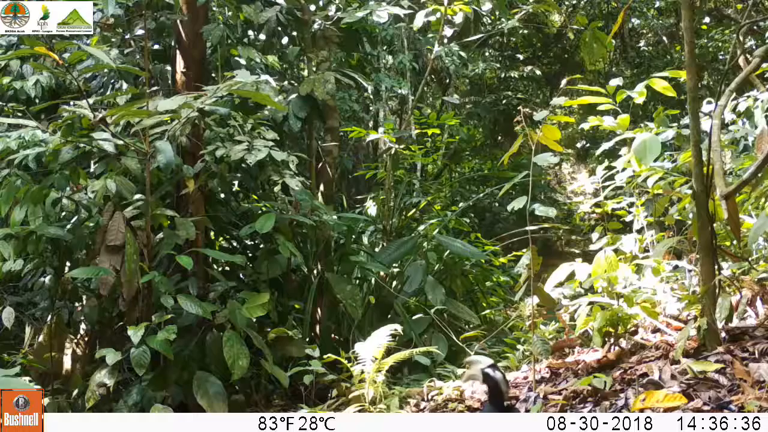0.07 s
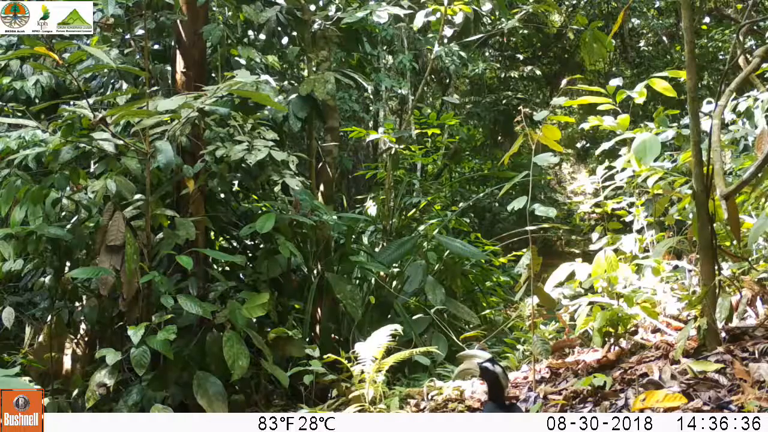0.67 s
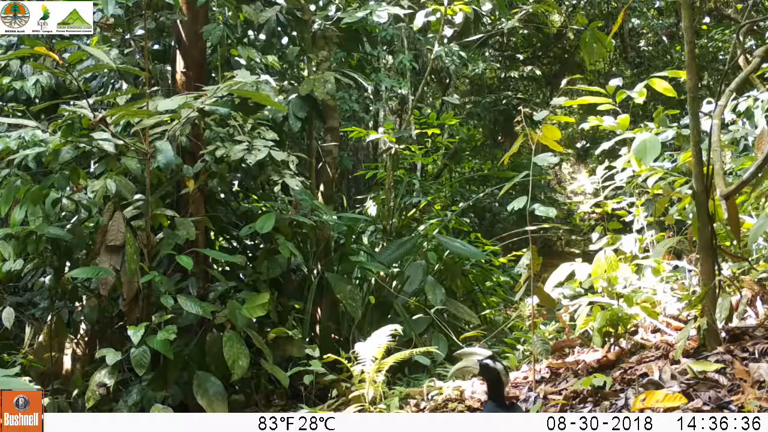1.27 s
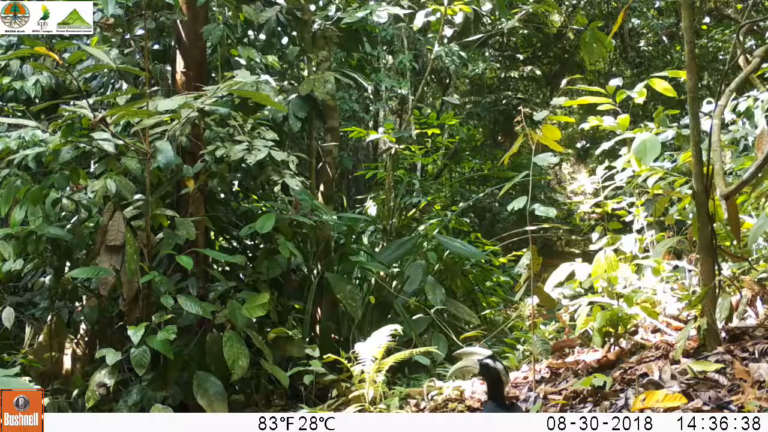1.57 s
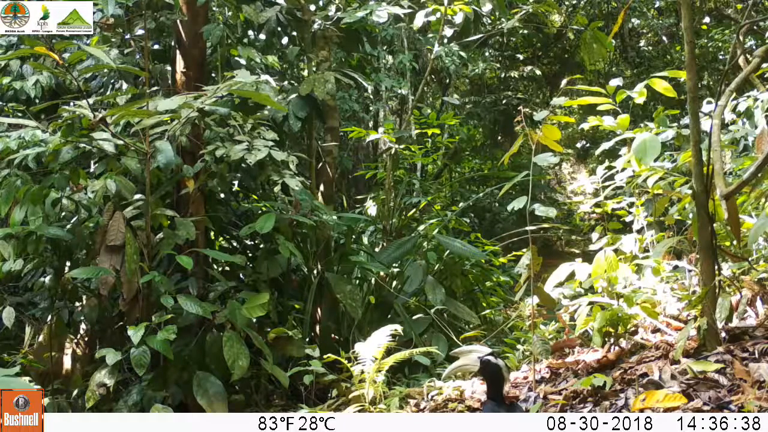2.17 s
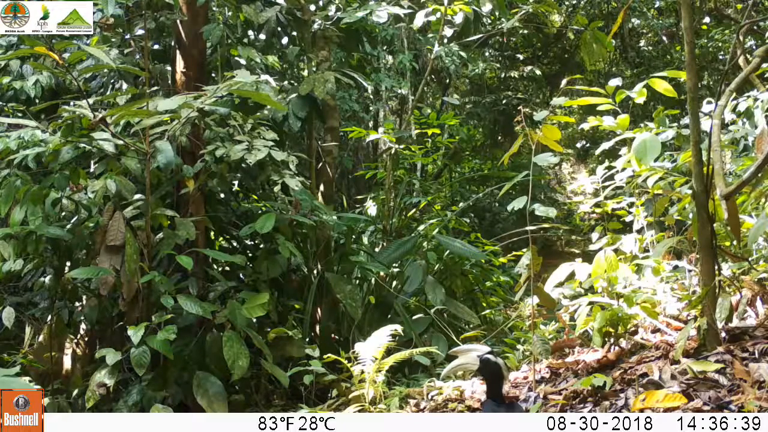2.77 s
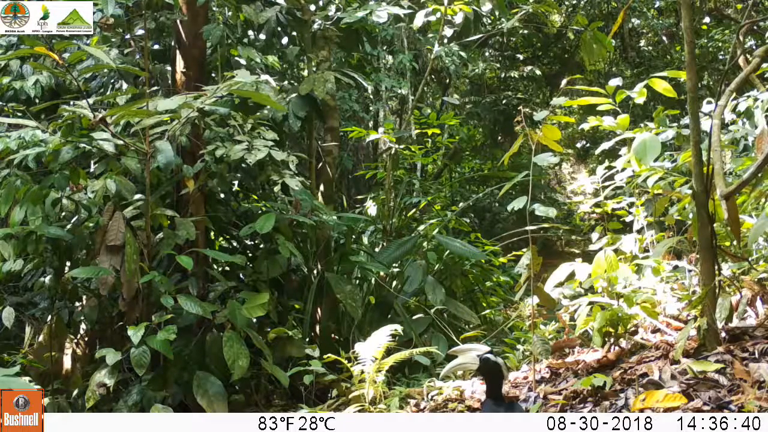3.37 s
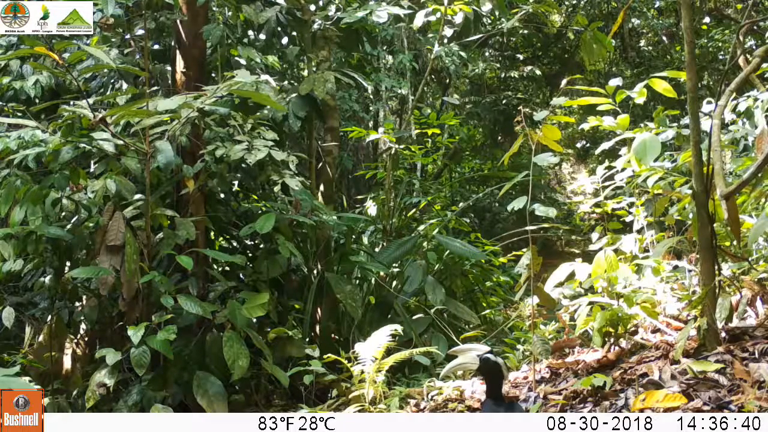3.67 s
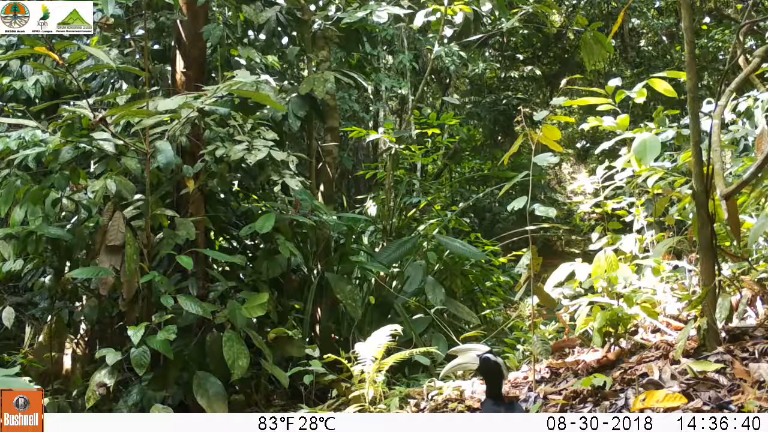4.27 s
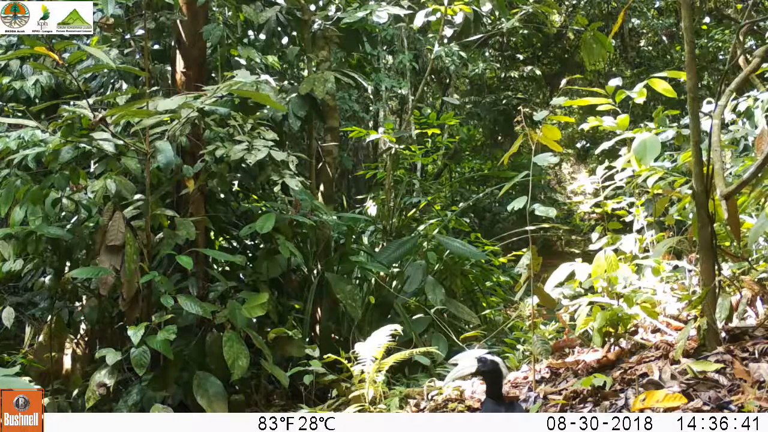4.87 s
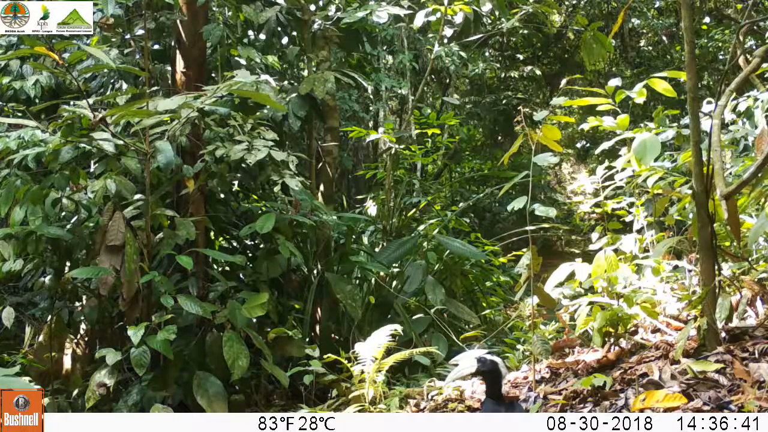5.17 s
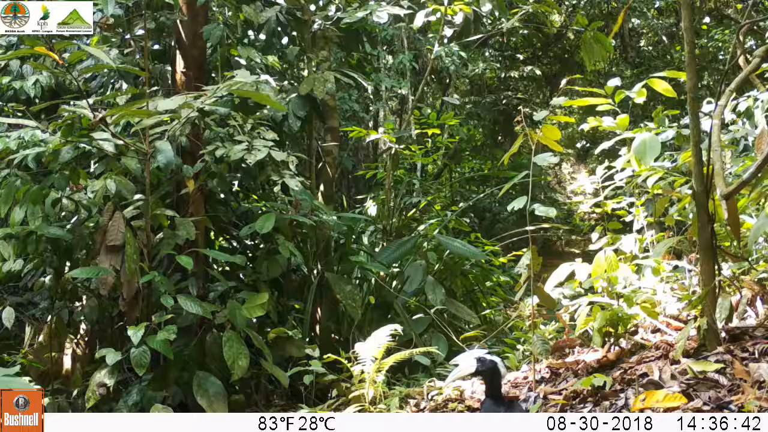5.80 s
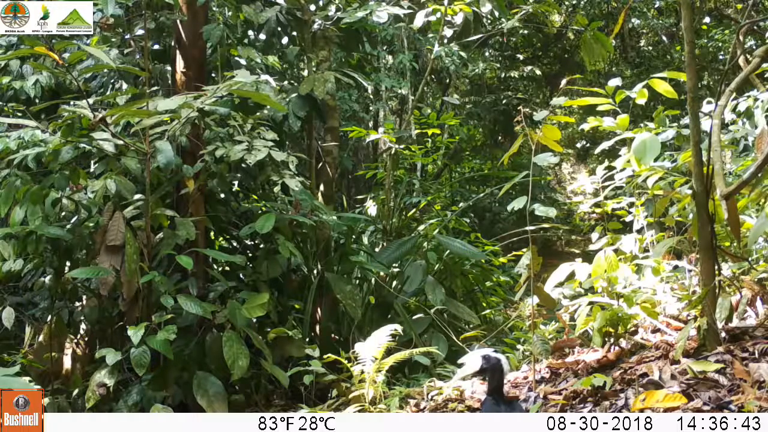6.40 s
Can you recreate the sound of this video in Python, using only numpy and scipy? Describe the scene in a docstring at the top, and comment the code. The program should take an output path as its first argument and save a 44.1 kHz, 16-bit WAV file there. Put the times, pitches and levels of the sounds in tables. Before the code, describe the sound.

Countless insects make a steady high hiss in a dense tropical forest. A nearby cicada repeats a two-part phrase, a lower whine then a high rasp, and farther cicadas answer. At the start a low rumble buffets the trail camera's microphone and the leaf litter ticks twice. A cricket joins briefly past the middle, and near the end a small bird whistles seven quick double chirps.

```python
"""Dense tropical forest, heard through the single microphone of a trail camera.
Cicadas trade two-part phrases, a low whine and then a high rasp: their tymbals click in turn and
drive the sliding resonance of the abdomen. Behind them countless insects merge into a hiss, from which
a drone, a trill, a shrill voice and one cricket stand out as narrow bands. At the start a rumble buffets
the camera and the leaf litter ticks twice; near the end a small bird whistles seven quick double chirps."""
import sys
import numpy as np
from scipy import signal
from scipy.fft import rfft, irfft
from scipy.io import wavfile

SR = 44100
rng = np.random.default_rng(int(sys.argv[2]) if len(sys.argv) > 2 else 0)


def transcribe(u):
    """Save the signal u as a 16-bit wav file named by the first command-line argument.

    u: samples, shape (n,) or (channels, n), limited to [-1, 1]; the rate is SR.
    q: integer samples, one column per channel.
    """
    v = np.clip(np.atleast_2d(u).T, -1, 1)
    q = np.round(v * 32767).astype(np.int16)
    wavfile.write(sys.argv[1], SR, q)


N = 292824
TIME = np.arange(N) / SR

# noise spectra: frequency_hz, relative_density_db
AIR_SPECTRUM = [(15, -0.5), (45, -2.5), (110, 0.5), (180, -3.5), (300, -6.5), (600, -10.5), (1100, -15),
                (2500, -15), (8000, -38)]  # still air
CHORUS_SPECTRUM = [(1400, -46), (1700, -21), (2200, -15), (2700, -15.5), (3300, -24.5), (3900, -11),
                   (4500, -4), (5600, 0), (6600, -6.5), (7500, -4.5), (8500, -14), (9600, -12),
                   (11500, -20), (15800, -29.5)]  # far insects
DIN_SPECTRUM = [(1600, -25), (2100, -11), (2550, 1), (2900, 2), (3150, 1.5), (3700, 1), (4200, -1),
                (5000, -38)]  # very distant whines, blurred together
FIZZ_SPECTRUM = [(7000, -22), (9500, -11.5), (10700, 0), (12000, -7.5), (12900, -3.5), (14000, -14),
                 (15800, -21)]  # small insects
RUMBLE_SPECTRUM = [(12, -2), (30, 3), (80, 0), (125, -10), (175, -14.5), (260, -26), (450, -38),
                   (1500, -44)]  # buffeting of the camera
# bursts of fizz: start_s, length_s, relative_level_db
FIZZ_BURSTS = [(.5, 0.79, -62), (.95, 0.38, -58), (1.8, 1.6, -61), (3.47, 0.55, -57.5), (4.25, 0.62, -57),
               (5.2, 0.46, -56), (5.6, 1.2, -58.5)]
# lull in the shrill voice: start_s, length_s, gain_db
SHRILL_LULL = [(4.75, 0.55, -3)]
# calls of the trilling insect: start_s, length_s, level_db, full_pitch_hz, whistle_share
TRILL_CALLS = [(-.3, 1.28, -55.5, 4270, 0.1), (0.795, 1.68, -56, 4340, 0.15), (2.8, 1.11, -56, 4236, 0.52),
               (3.9, 0.6, -57.5, 4280, 0), (4.896, 2.4, -56, 4240, 0.33)]
# buffets of the rumble: start_s, length_s, level_db
BUFFETS = [(.0, 0.648, -47), (.075, 0.087, -41.5), (.155, 0.064, -38.5), (.31, 0.12, -40.5),
           (.62, 0.14, -53), (.83, 0.096, -54.5)]

# low notes of the near cicada: start_s, length_s, level_db
NEAR_WHINES = [(0.053, 0.27, -48.5), (1.289, .28, -47.5), (2.49, 0.29, -47.5), (3.644, 0.33, -47),
               (4.793, .3, -47), (5.919, .29, -47)]
# its high notes: start_s, length_s, level_db, noise_share, tymbal_imbalance
NEAR_RASPS = [(.265, 0.18, -45.5, 0.3, 0), (1.512, 0.26, -42.5, 0.25, 0.4), (2.717, 0.24, -43.5, 0, 0.54),
              (3.885, 0.25, -43.5, 0.21, 0.7), (5.021, 0.25, -43.5, 0.25, 0.25),
              (6.146, 0.25, -46, 0.26, 0.86)]
# low notes of farther cicadas: start_s, length_s, level_db, noise_share
FAR_WHINES = [(0.528, .4, -56.5, 0.25), (1.804, 0.37, -55.5, 0.38), (2.33, 0.16, -55, .3),
              (2.98, 0.46, -54.5, 0.22), (4.274, 0.19, -49.5, 0), (5.469, 0.19, -46.5, 0),
              (5.7, .15, -53.5, 0.24)]
# their high notes: start_s, length_s, level_db, click_rate_hz, noise_share, tymbal_imbalance
FAR_RASPS = [(.0, 0.17, -48, 287, 0.65, 0.36), (.7, 0.28, -50.5, 286, 0.51, 0.51),
             (1.98, 0.24, -51.5, 287, 0.44, 0.36), (2.43, 0.2, -51, 296.7, 0.47, 0.24),
             (3.14, 0.37, -48.5, 292, 0.6, 0.34), (4.45, 0.26, -47.5, 287.8, 0.069, .97),
             (5.66, 0.26, -46, 285, 0.43, 1)]
# course of a note: length_share, gain_db, resonance_hz, width_hz, upper_mode_db, imbalance_share
NEAR_WHINE_COURSE = [(0, -6.5, 2090, 450, 12, 1), (.12, -9, 2440, 400, -1.5, 1),
                     (.22, -3.5, 2750, 300, -13, 1), (.46, 2.5, 2880, 223, -14.5, 1),
                     (.7, -1, 2836, 218, -9, 1), (.85, 4, 2885, 197, -21, 0.85),
                     (1, -9, 2780, 220, -24, 0.92)]
NEAR_RASP_COURSE = [(0, 2, 6600, 456, -11, 0), (.08, 4.5, 6050, 705, -29, 0), (.25, 4.5, 5900, 920, -18, 0),
                    (.45, 0, 5500, 1200, -8.5, 1), (.78, 0.5, 5580, 1070, -11.5, 1),
                    (1, -8, 5250, 1200, -22, 1)]
FAR_WHINE_COURSE = [(0, -13.5, 2760, 330, -14, 1), (.2, -0.5, 2740, 260, -24, 1),
                    (.7, 1.5, 2750, 260, -17, 1), (1, -7.5, 2700, 330, -20, 1)]
FAR_RASP_COURSE = [(0, 1, 5870, 1580, -18, 1), (.2, 5.2, 5670, 1500, -24, 1),
                   (.5, 3.2, 5670, 1500, -4.5, 0.84), (.8, 1.6, 5580, 1440, -9, 0.94),
                   (1, 0.82, 5550, 1480, -13, 0.92)]
# constant colour of the cicadas' bodies: frequency_hz, gain_db
NEAR_BODY = [(2300, 0), (2600, -4), (2890, 0), (3200, 1), (3530, 3), (4600, 0), (4850, 2), (5120, 0),
             (5405, 2), (5690, -4), (5970, 0)]
FAR_BODY = [(3100, 3.5), (3700, 2), (4750, -4), (5050, 9), (5340, 4.5), (5630, 6), (5920, 1.5), (6200, 8.5),
            (6500, -4.5)]

# snaps in the leaf litter, in two close pairs: start_s, level_db
TICKS = [(.4008, -33), (.4043, -40), (.4112, -35), (.414, -31)]
# modes rung by a snap: frequency_hz, gain_db, t60_s
TICK_MODES = [(3440, -3, 0.033), (5800, -26, 0.0078), (7000, -28, .004)]
# the cricket's one call: start_s, length_s, level_db
CRICKET_CALL = [(3.78, 1.3, -53.5)]
# the bird's double chirps: start_s, level_db, starting_pitch_hz
CHIRPS = [(5.343, -37, 5080), (5.4125, -35, 5150), (5.508, -35, 5180), (5.604, -35, 5200),
          (5.698, -35, 5160), (5.797, -35, 5160), (5.9005, -35.5, 5230)]
# reverberation time of the forest: frequency_hz, t60_s
FOREST_DECAY = [(1000, 0.84), (3000, 0.64), (6000, 0.42), (12000, 0.19)]
# opening of the camera's input: time_s, gain
SWITCH_ON = [(.035, 0), (.037, .04), (.046, .08), (.049, 1)]


def amp(db):
    """Amplitude grows tenfold for every 20 dB."""
    return 10 ** (np.asarray(db) / 20)


def unit_rms(x):
    """Normalisation: scales a signal to unit mean power."""
    return x / np.sqrt(np.mean(x ** 2) + 1e-20)


def at_frequency(points, hz):
    """Interpolation of a curve along a logarithmic frequency axis."""
    frequency, value = np.transpose(points)
    return np.interp(np.log(hz + 1), np.log(frequency + 1), value)


def follow(rows, t=TIME):
    """Linear interpolation of each column of a curve at the times t."""
    times, *columns = np.transpose(rows)
    return [np.interp(t, times, column) for column in columns]


def add(mix, start_s, sound):
    """Superposition: a sound adds to the mix from its start time."""
    part = mix[max(round(start_s * SR), 0):][:len(sound)]
    part += sound[:len(part)]


def noise(spectrum):
    """Spectral shaping gives white noise a steady colour, at unit power."""
    gain = amp(at_frequency(spectrum, np.fft.rfftfreq(N, 1 / SR)))
    return unit_rms(irfft(rfft(rng.standard_normal(N)) * gain, N))


def wander(rate_hz, t=TIME):
    """Random modulation: glides between chance values of about unit size."""
    return np.interp(t * rate_hz, np.arange(2048), rng.standard_normal(2048))


def swell(start_s, length_s, edge_s):
    """An amplitude envelope that rises from 0 to 1 on a quarter sine, holds and falls back."""
    inside = np.minimum(TIME - start_s, start_s + length_s - TIME) / min(edge_s, length_s / 2)
    return np.sin(np.pi / 2 * np.clip(inside, 0, 1))


def bursts(rows, edge_s):
    """Incoherent addition: the gain of overlapping swells whose powers add."""
    return np.sqrt(sum((amp(db) * swell(start, length, edge_s)) ** 2 for start, length, db in rows))


def mode(hz, centre_hz, width_hz):
    """Complex frequency response of two like resonators in cascade."""
    return 1 / (1 + 2j * (hz - centre_hz) / width_hz) ** 2


def resonate(x, hz, width_hz):
    """Forced resonance: x drives a steep-sided band whose centre follows hz."""
    carrier = np.exp(2j * np.pi * np.cumsum(hz * np.ones(len(x))) / SR)
    pole = np.exp(-np.pi * width_hz / SR)
    return (carrier * signal.lfilter([(1 - pole) ** 2], [1, -2 * pole, pole * pole], x / carrier)).real


def forest(x, wet_db):
    """Scattering by trunks and leaves moves part of the energy into a tail whose treble dies first."""
    hz, t, spectra = signal.stft(rng.standard_normal(SR * 3 // 4), SR, nperseg=256)
    decay = amp(-60 * t / at_frequency(FOREST_DECAY, hz)[:, None])
    build_up = np.minimum(t / .02, 1)
    tail = signal.istft(spectra * decay * build_up, SR, nperseg=256)[1]
    heard = unit_rms(np.pad(x, (0, len(tail) - 1))) + amp(wet_db) * unit_rms(signal.fftconvolve(x, tail))
    return heard * np.linalg.norm(x) / np.linalg.norm(heard)


def insect_band(hz, width_hz, throb_hz, throb_db):
    """Amplitude modulation: a distant insect's strokes make a narrow band of noise throb."""
    strokes = np.sin(2 * np.pi * np.cumsum(throb_hz * (1 + 0.031 * wander(3.92))) / SR)
    return unit_rms(resonate(rng.standard_normal(N), hz, width_hz) * amp(throb_db * strokes))


def still_air():
    """Ambient noise: a faint, steady floor, strongest in the bass."""
    return amp(-67) * noise(AIR_SPECTRUM)


def chorus(stir_s=0.31, join_s=.55, ebb_db_per_s=0.5, flutter_db=1.21):
    """Incoherent sources: countless insects merge into a fluttering hiss, a low din and a thin fizz."""
    # the hiss swells just after each near rasp; the din joins in with every whine
    stirred = sum(swell(start + 0.074, stir_s, stir_s) for start, *_ in NEAR_RASPS)
    near_joins = [swell(start, join_s, join_s / 4) for start, *_ in NEAR_WHINES]
    far_joins = [swell(start, length, length / 4) for start, length, *_ in FAR_WHINES]
    joined = np.max(near_joins + far_joins, axis=0)
    hiss = noise(CHORUS_SPECTRUM) * amp(-46.5 + 0.87 * stirred)
    din = noise(DIN_SPECTRUM) * amp(-57.5 + 2 * joined - ebb_db_per_s * TIME)
    fizz = noise(FIZZ_SPECTRUM) * np.hypot(amp(-65), amp(-2) * bursts(FIZZ_BURSTS, edge_s=0.077))
    return (hiss + din + fizz) * amp(flutter_db * wander(70))


def drone(pitch_hz=1885, swing_hz=42.5, phrase_s=1.11, low_point_s=2.68):
    """Slow frequency modulation: a distant cicada's pitch sags and recovers once a phrase."""
    hz = pitch_hz - swing_hz * np.cos(2 * np.pi * (TIME - low_point_s) / phrase_s)
    return insect_band(hz, width_hz=208, throb_hz=32.2, throb_db=.5) * amp(-62 + 2 * wander(9))


def shrill(fade_db_per_s=0.62):
    """A drifting resonance: a very high insect voice sinks a little as it fades, with one brief lull."""
    lull_db = sum(db * swell(start, length, length) for start, length, db in SHRILL_LULL)
    level_db = -52.5 - fade_db_per_s * TIME + lull_db
    hz = np.linspace(9620, 9300, N)
    return insect_band(hz, width_hz=800, throb_hz=44.5, throb_db=.5) * amp(level_db)


def trill(flat_hz=111, climb_s=.45, waver_hz=8):
    """Exponential glide: each call, a thin whistle in a scratchy band, starts flat and climbs to pitch."""
    out = np.zeros(N)
    for start, length, db, full_hz, whistle_share in TRILL_CALLS:
        hz = full_hz - flat_hz * np.exp(-np.maximum(TIME - start, 0) / climb_s)
        whistle = np.sqrt(2) * np.sin(2 * np.pi * np.cumsum(hz + waver_hz * wander(50)) / SR)
        scratch = insect_band(hz, width_hz=230, throb_hz=25.6, throb_db=-0.5)
        voice = np.sqrt(whistle_share) * whistle + np.sqrt(1 - whistle_share) * scratch
        out += amp(db) * swell(start, length, edge_s=0.18) * voice
    return out


def rumble():
    """Enveloped low-frequency noise buffets the camera in the first second."""
    return noise(RUMBLE_SPECTRUM) * bursts(BUFFETS, edge_s=0.049)


def tymbal_song(notes, course, colour, upper_hz, upper_width_hz, waver, wet_db,
                scoop=0, spin_up_share=1, stutter=0, hoarse_db=0):
    """Source and filter: two tymbals click in turn into an abdomen whose resonance slides as it stretches."""
    out = np.zeros(N)
    order = np.arange(12, 66)[:, None]  # multiples of half the click rate
    for start, length, db, click_hz, noise_share, imbalance in notes:
        t = np.arange(int(length * SR)) / SR
        gain_db, body_hz, width_hz, upper_db, imbalance_share = follow(course, t / length)
        upper_gain = amp(upper_db + hoarse_db * noise_share)  # a hoarse note stirs the upper mode more
        # while the muscles spin up, scoop lowers the pitch and stutter roughens the note
        lag = np.exp(-t / (spin_up_share * length))
        speed = 1 - scoop * lag + waver * wander(60, t)
        roughness = np.clip(noise_share + stutter * lag, 0, 1)
        cycles = np.cumsum(click_hz * speed) / SR
        # unequal tymbals put lines halfway between the harmonics
        odd = np.clip(imbalance * imbalance_share, 0, 1)
        nominal_hz = order * click_hz / 2
        strength = np.where(order % 2, odd, 1 - odd) * amp(at_frequency(colour, nominal_hz))
        body = mode(nominal_hz * speed, body_hz, width_hz)
        upper = upper_gain * mode(nominal_hz * speed, upper_hz, upper_width_hz)
        lines = strength * (body - upper)  # the modes move in antiphase, so lines between them add up
        tone = (lines * np.exp(1j * np.pi * order * cycles)).real.sum(0) / np.linalg.norm(lines, axis=0)
        # noise pulsing at the click rate drives the same two modes
        scrape = rng.standard_normal(SR)[:len(t)] * (2 + np.cos(2 * np.pi * cycles))
        rasp = unit_rms(resonate(scrape, body_hz, width_hz.mean()))
        rasp += upper_gain * unit_rms(resonate(scrape, upper_hz, upper_width_hz))
        song = np.sqrt(1 - roughness) * unit_rms(tone) + np.sqrt(roughness) * unit_rms(rasp)
        envelope = amp(db + gain_db) * signal.windows.tukey(len(t), .06)
        add(out, start, forest(envelope * song, wet_db))
    return out


def cicada_whines(near_click_hz=289.8, far_click_hz=281.7, cold_hz=7, warm_up_s=1.2, imbalance=.03):
    """A narrow resonance picks out few harmonics; the near cicada clicks faster as it warms up."""
    near_notes = [(start, length, db, near_click_hz - cold_hz * np.exp(-start / warm_up_s), 0.032, imbalance)
                  for start, length, db in NEAR_WHINES]
    far_notes = [(start, length, db, far_click_hz, noise_share, imbalance)
                 for start, length, db, noise_share in FAR_WHINES]
    near = tymbal_song(near_notes, NEAR_WHINE_COURSE, NEAR_BODY, upper_hz=3240, upper_width_hz=460,
                       waver=0.00089, wet_db=-5.5, scoop=.12, spin_up_share=.125, stutter=0.56)
    far = tymbal_song(far_notes, FAR_WHINE_COURSE, FAR_BODY, upper_hz=3090, upper_width_hz=260,
                      waver=0.00092, wet_db=-0.5, scoop=0.0398, spin_up_share=0.152, hoarse_db=43)
    return near + far


def cicada_rasps(near_click_hz=284.4):
    """A high, broad resonance passes many harmonics, which beat as a rasp; farther cicadas answer."""
    near_notes = [(start, length, db, near_click_hz, noise_share, imbalance)
                  for start, length, db, noise_share, imbalance in NEAR_RASPS]
    near = tymbal_song(near_notes, NEAR_RASP_COURSE, NEAR_BODY, upper_hz=8110, upper_width_hz=1040,
                       waver=0.00074, wet_db=-1.5)
    far = tymbal_song(FAR_RASPS, FAR_RASP_COURSE, FAR_BODY, upper_hz=7730, upper_width_hz=410,
                      waver=0.00065, wet_db=-0.5)
    return near + far


def ticks():
    """Free vibration: small dry snaps in the leaf litter ring three heavily damped modes."""
    t, out = np.arange(SR // 20) / SR, np.zeros(N)
    ring = sum(amp(db - 60 * t / t60) * np.sin(2 * np.pi * hz * t) for hz, db, t60 in TICK_MODES)
    for start, db in TICKS:
        add(out, start, amp(db) * ring)
    return forest(out, wet_db=-13)[:N]


def cricket():
    """Stroke-modulated resonance: a cricket joins once with a slowly throbbing band."""
    return insect_band(4790, width_hz=440, throb_hz=11, throb_db=1) * bursts(CRICKET_CALL, edge_s=.12)


def bird(chirp_s=0.018, pair_spacing_s=.025):
    """Pure-tone glides in pairs: each chirp is a whistle that holds its pitch and then drops."""
    progress, out = np.linspace(0, 1, int(chirp_s * SR)), np.zeros(N)
    glide = 1 - .095 * progress ** 3
    envelope = signal.windows.tukey(len(progress), .55)
    for start, db, hz in CHIRPS:
        whistle = np.sqrt(2) * np.sin(2 * np.pi * np.cumsum(hz * glide) / SR)
        for onset in (start, start + pair_spacing_s):
            add(out, onset, amp(db) * whistle * envelope)
    return forest(out, wet_db=-15)[:N]


def scene():
    """Superposition at one microphone: all voices add, and both channels are alike."""
    mix = still_air() + chorus() + drone() + shrill() + trill() + rumble()
    mix += cicada_whines() + cicada_rasps() + ticks() + cricket() + bird()
    return np.array([mix, mix])


def record(dry):
    """Gating and band limiting: the camera's input opens after a moment and cuts the highest treble."""
    live = dry * follow(SWITCH_ON)[0]
    low_pass = signal.firwin(511, cutoff=15760, window=("kaiser", 9), fs=SR)
    return signal.oaconvolve(live, low_pass[None], "same")


dry = scene()
out = record(dry)
transcribe(out)
```